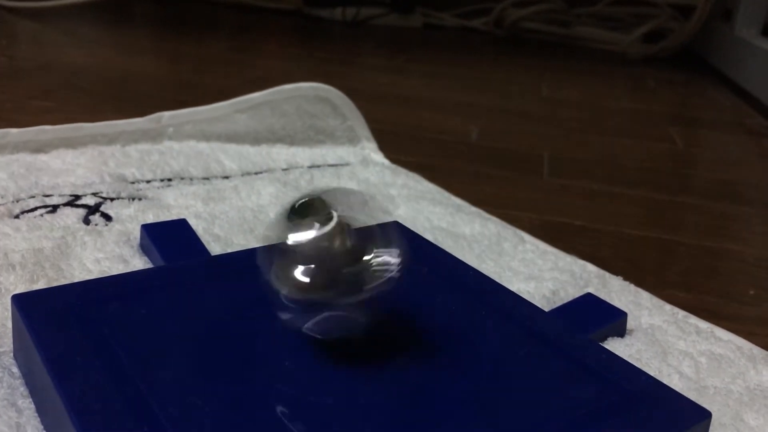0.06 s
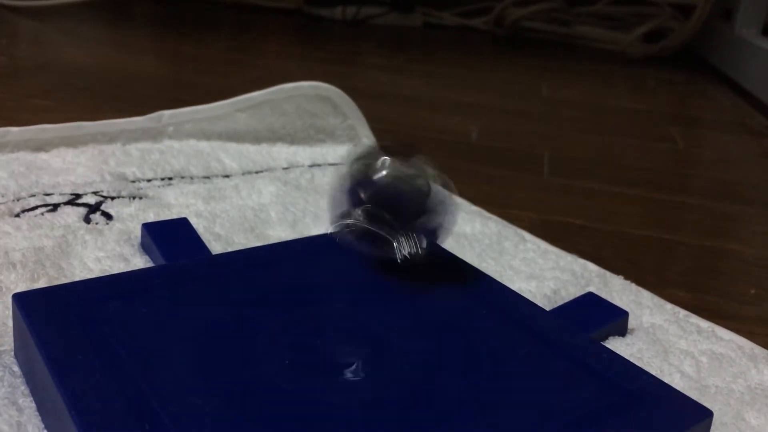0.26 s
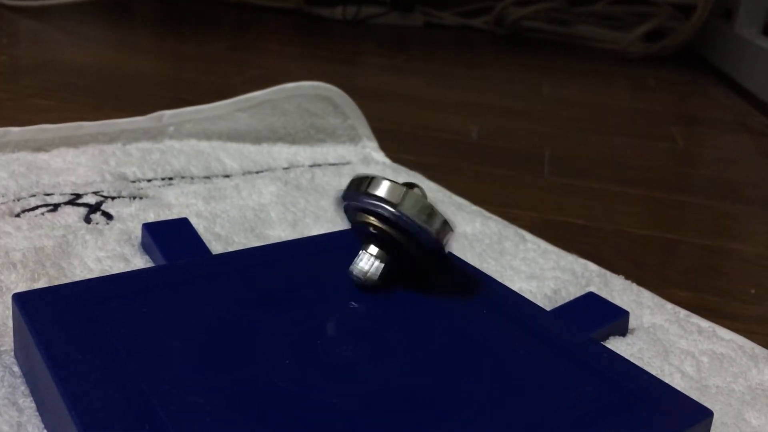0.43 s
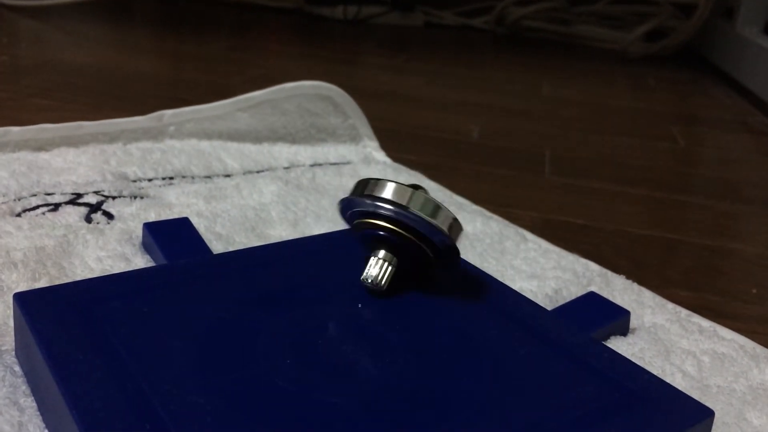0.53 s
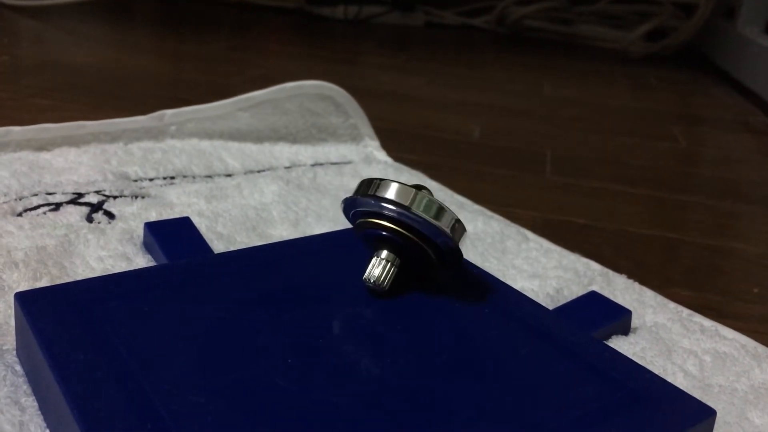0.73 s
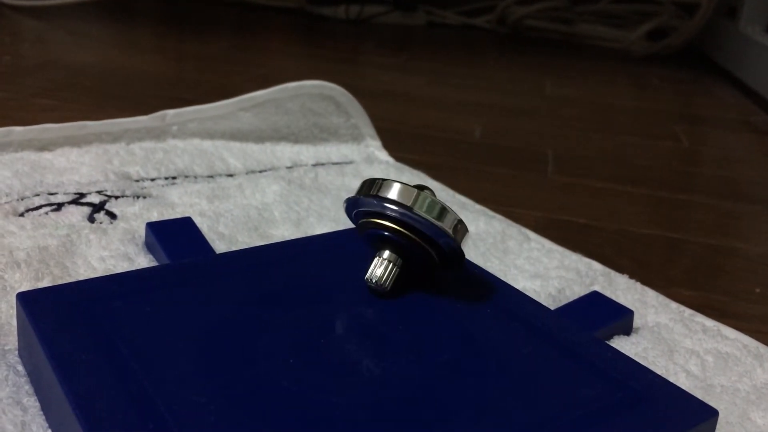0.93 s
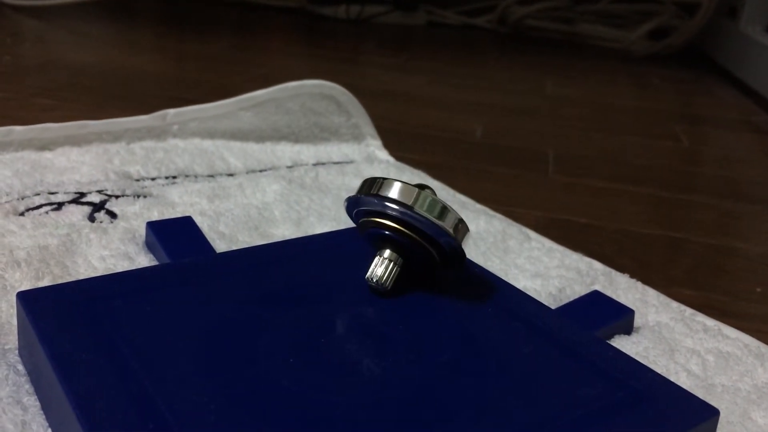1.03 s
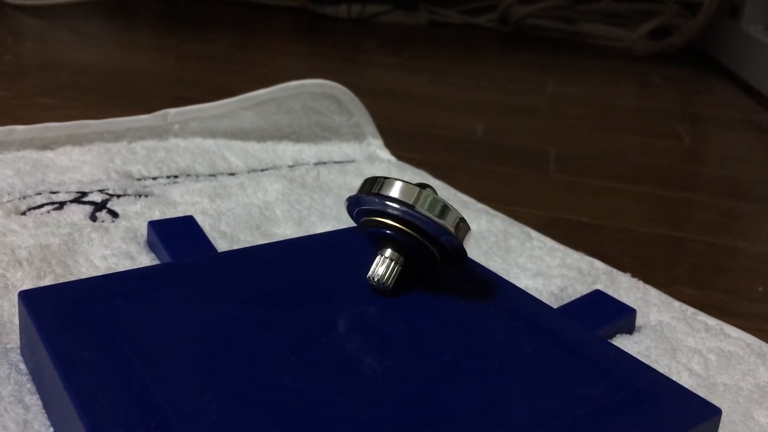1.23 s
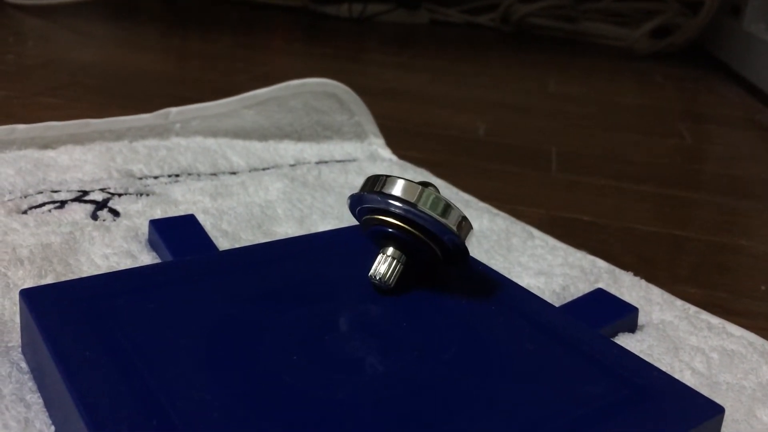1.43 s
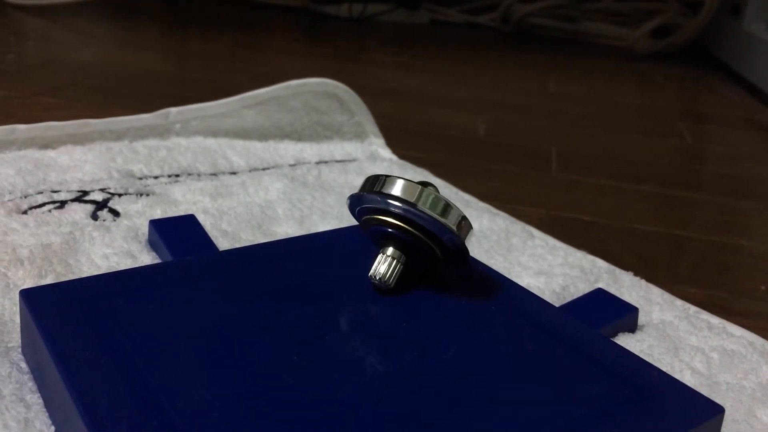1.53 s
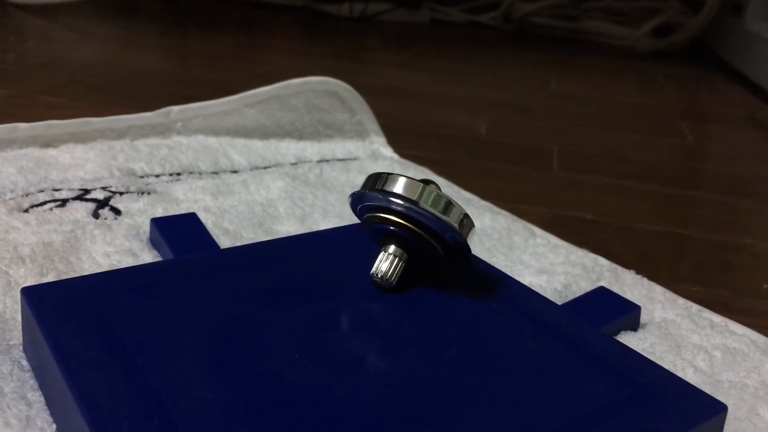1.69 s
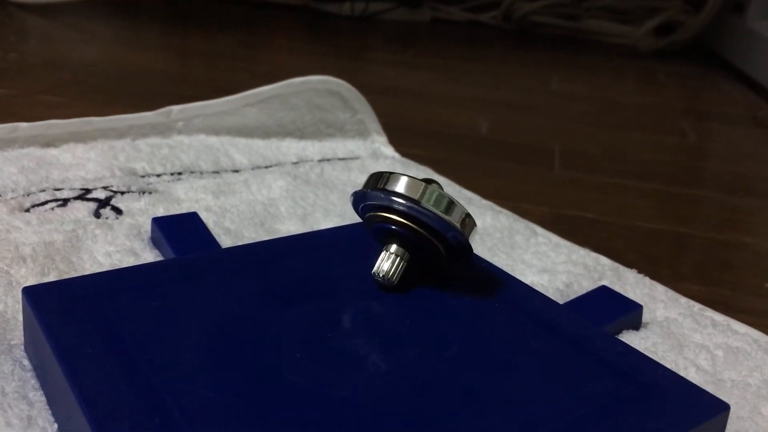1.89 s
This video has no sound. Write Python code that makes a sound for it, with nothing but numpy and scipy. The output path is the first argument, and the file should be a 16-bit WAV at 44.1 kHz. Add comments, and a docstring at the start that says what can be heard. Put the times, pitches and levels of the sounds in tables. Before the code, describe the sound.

In a quiet room, a metal top runs out of spin on a plastic block: light ticking, then a louder, scraping clatter with a soft low throb. It settles quickly, leaving only faint hum and room air.

```python
"""A small metal top runs out of spin on a hollow plastic block in a quiet room.
Its tip chatters, then its rim strikes the block in a quick run of clacks, skids and comes to rest.
Each contact rings the block's box and face and the top's body and loose parts.
The block rocks on its cloth with a low throb; room air and a faint appliance hum remain."""
import sys
import numpy as np
from scipy import signal
from scipy.fft import rfft, irfft
from scipy.io import wavfile

SR = 44100
rng = np.random.default_rng(int(sys.argv[2]) if len(sys.argv) > 2 else 0)


def transcribe(signal):
    """Save signal, clipped to [-1, 1], as a 16-bit WAV file at the path in sys.argv[1]."""
    frames = np.atleast_2d(signal).T
    limited = np.clip(frames, -1, 1)
    pcm = np.round(limited * 32767).astype(np.int16)
    wavfile.write(sys.argv[1], SR, pcm)


N = 85995
TIME = np.arange(N) / SR

# modes of the plastic block and the metal top: f/Hz, level/dB, T60/s
BLOCK_BOX = [(426.3, -20, .08), (508, -19.5, 0.054), (637.4, -7, 0.048), (707.4, -11, 0.072),
             (711.3, -7.5, .08), (762.5, -5.5, 0.033), (950, -11.5, 0.024)]
BLOCK_FACE = [(1149, -9, .04), (1299, -4.5, .04), (1483, -8.5, 0.029), (1645, -8.5, .018),
              (1866, -10.5, .016), (2180, -10, 0.012)]
TOP_BODY = [(2783, -15, .01), (3377, -6.5, 0.014), (3622, -2.5, .02), (4014, -2.5, 0.009),
            (4457, -8.5, .01), (4900, -6.5, .006), (5454, -9, 0.0077), (6590, -9, .006), (6820, -11, 0.017),
            (8000, -2.5, .004)]
TOP_PARTS = [(8457, 4, .005), (8460, -5, 0.008), (9330, 1, 0.019), (10270, 0.5, .009), (10860, -3, 0.012),
             (12366, -11.5, 0.0023), (12400, -7, .003), (13340, -2.5, 0.009)]
MODE_SETS = (BLOCK_BOX, BLOCK_FACE, TOP_BODY, TOP_PARTS)
# dry crack per mode set: f_low/Hz, f_high/Hz, level/dB re the ring at 0 dB hardness
CRACK_BANDS = [(720, 1120, 1.5), (1150, 2200, -1), (3100, 7100, 1), (7800, 14000, 4.5)]


def from_db(db):
    """Decibels to gain."""
    return 10 ** (np.asarray(db) / 20)


def unit_rms(x):
    """Scale to rms 1."""
    return x / np.sqrt(np.mean(x ** 2) + 1e-20)


def envelope(points):
    """Gain over time from points of t/s, level/dB."""
    return from_db(np.interp(TIME, *np.transpose(points)))


def at_hz(points, hz):
    """Interpolate on a log-frequency axis."""
    f, value = np.transpose(points)
    return np.interp(np.log(hz + 1), np.log(f), value)


def butter(x, hz, kind="band"):
    """Order-2 Butterworth; the tiny offset avoids denormals."""
    return signal.sosfilt(signal.butter(2, hz, kind, fs=SR, output="sos"), x + 1e-18)


def drift(cutoff_hz):
    """Slow random wander, rms 1."""
    return unit_rms(butter(rng.standard_normal(2 * N), cutoff_hz, "low")[N:])


def ring(force, modes, crack_band, hardness_db):
    """A force rings a set of modes and gives a dry crack; rms 1."""
    ringing = 0
    for k, (hz, db, t60_s) in enumerate(modes):
        r, w = from_db(-60 / (t60_s * SR)), 2 * np.pi * hz / SR
        mode = signal.lfilter([1, -r * np.cos(w)], [1, -2 * r * np.cos(w), r * r], force + 1e-18)
        ringing = ringing + (-1) ** k * from_db(db) * mode
    ringing = butter(ringing, .85 * modes[0][0], "high")
    low_hz, high_hz, crack_db = crack_band
    crack = from_db(crack_db + hardness_db) * unit_rms(butter(force, [low_hz, high_hz]))
    crack_polarity = rng.choice([-1, 1])   # random sign varies the colour from hit to hit
    return unit_rms(unit_rms(ringing) + crack_polarity * crack)


def scrape():
    """Dense tiny rim slips ring the modes; as the spin dies, the sound moves from metal to block."""
    # overall scrape contour: t/s, level/dB
    contour = [(0, -52.5), (.085, -63.5), (.105, -64), (0.133, -77), (.165, -62), (.195, -74), (0.221, -62),
               (.232, -37.5), (.255, -45), (0.382, -44), (.402, -34), (.435, -37), (0.491, -41), (.52, -60),
               (0.552, -68), (.585, -99), (0.621, -120)]
    slips_per_s, grain_db = 2200, 2.5
    slowing_s, stop_s, dulling_db_per_s = .43, contour[-1][0], 63.5
    sizes = from_db(grain_db * np.minimum(rng.exponential(1, N), 4)) * rng.choice([-1, 1], N)
    slips = sizes * (rng.random(N) < slips_per_s / SR)
    tilt_db = dulling_db_per_s * np.clip(TIME - slowing_s, 0, stop_s - slowing_s)
    levels_db = (-1 + tilt_db, -5 + tilt_db / 2, -3.5, -5 - tilt_db / 2)
    out = np.zeros(N)
    for modes, crack_band, db in zip(MODE_SETS, CRACK_BANDS, levels_db):
        out += from_db(db) * ring(slips, modes, crack_band, hardness_db=-2.5)
    return envelope(contour) * out


def rocking():
    """The shaken block rocks on its cloth: a low, unsteady throb."""
    # throb contour: t/s, level/dB
    contour = [(0, -46.5), (.025, -39), (.06, -50), (.14, -53), (.215, -65), (.245, -38), (.275, -35.5),
               (.31, -40.5), (.365, -37.5), (.42, -45.5), (.5, -58.5), (.62, -72)]
    rock_hz, waver, flutter_db = 84, .11, 2
    phase = 2 * np.pi * np.cumsum(rock_hz * (1 + waver * drift(39.86))) / SR
    return envelope(contour) * from_db(flutter_db * drift(43)) * unit_rms(np.sin(phase))


def background():
    """Steady room air and an appliance's hum."""
    # air noise spectrum: f/Hz, relative density/dB
    air_spectrum = [(25, -17.5), (53, -8.5), (80, -2.5), (120, -8), (150, -11.5), (212, -10.5),
                    (394, -19.5), (480, -18.5), (659, -17.5), (760, -26), (1300, -25.5), (1900, -25),
                    (2500, -32.5), (3720, -37), (8000, -42.5), (14800, -44.5)]
    # hum tones: f/Hz, level/dB
    hum_tones = [(91.5, -71.5), (118.6, -65), (506, -80.5), (672, -82.5)]
    air_db, jitter_rad = -62.5, .14
    bins_hz = np.arange(N // 2 + 1) * SR / N
    air = irfft(rfft(rng.standard_normal(N)) * from_db(at_hz(air_spectrum, bins_hz)), N)
    hum = sum(from_db(db) * unit_rms(np.sin(2 * np.pi * hz * TIME + jitter_rad * drift(4)))
              for hz, db in hum_tones)
    return from_db(air_db) * unit_rms(air) + hum


def contact_force(graze_s, length_s=.2):
    """One touch, then a brief swell of micro-impacts as the spinning rim grazes on."""
    impacts_per_s, graze_db = 16000, -9
    t = np.arange(int(length_s * SR)) / SR
    swell = np.abs(np.sin(np.pi * np.minimum(t / graze_s, 1))) ** 1.2
    impacts = rng.standard_normal(len(t)) * (rng.random(len(t)) < impacts_per_s / SR)
    force = from_db(graze_db) * swell * impacts
    force[0] = 1
    return force


def add_hit(out, start_s, sound, db, attack_s=.005):
    """Mix a sound in, scaled so that its attack has the given level."""
    i = int(start_s * SR)
    out[i:i + len(sound)] += from_db(db) * sound[:N - i] / np.std(sound[:int(attack_s * SR)])


def clatter():
    """Each contact rings block and top over a dull thud; harder contacts crack more."""
    # contacts, before trim: t/s, graze/s, box knock/dB, face slap/dB, body clack/dB, parts tick/dB
    contacts = [(0.0055, 0.0007, -37, -44, -44, -36), (0.0166, 0.001, -38, -46, -60, -58),
                (0.0268, 0.001, -40, -48, -48, -51), (0.0376, 0.001, -43, -53, -54, -51),
                (0.045, 0.001, -50, -56, -60, -53), (0.055, 0.001, -41, -57, -53, -47),
                (0.064, 0.001, -42, -52, -50, -48), (0.07, 0.001, -43, -52, -50, -55),
                (0.0768, 0.001, -39, -50, -57, -61), (0.083, 0.002, -44, -50, -47, -55),
                (0.113, 0.001, -47, -53, -57, -61), (0.1435, 0.001, -44, -44, -47, -48),
                (0.1505, 0.001, -43, -49, -63, -63), (0.1715, 0.002, -49, -51, -53, -55),
                (0.176, 0.001, -47, -48, -51, -56), (0.2097, 0.001, -59, -59, -52, -52),
                (0.2176, 0.001, -53, -53, -52, -50), (0.225, 0.002, -30, -28, -22, -21),
                (0.2608, 0.004, -30, -37, -25, -23), (0.2683, 0.0018, -31, -38, -29, -33),
                (0.2733, 0.002, -40, -45, -30, -33), (0.2818, 0.002, -30, -31, -23, -24),
                (0.2888, 0.001, -38, -41, -34, -27), (0.3086, 0.0032, -31, -36, -20, -20),
                (0.3223, 0.002, -27, -31, -22, -27), (0.3445, 0.0018, -28, -31, -24, -33),
                (0.3613, 0.0028, -24, -25, -19, -17), (0.3745, 0.0015, -41, -41, -42, -39),
                (0.3904, 0.002, -22, -24, -19, -20), (0.3945, 0.003, -29, -31, -30, -31),
                (0.4018, 0.001, -31, -26, -29, -35), (0.407, 0.004, -34, -34, -35, -35),
                (0.4155, 0.001, -31, -37, -23, -30), (0.4203, 0.0023, -34, -38, -26, -23),
                (0.4555, 0.0025, -35, -35, -33, -36), (0.46, 0.001, -43, -45, -37, -39),
                (0.474, 0.001, -47, -50, -41, -50), (0.49, 0.0025, -36, -43, -36, -42),
                (0.512, 0.004, -38, -43, -52, -60), (0.523, 0.003, -50, -66, -54, -62),
                (0.559, 0.004, -61, -71, -59, -55)]
    trims_db = (-1, -.5, 1, .2)
    hard_hit_db, crack_db_per_db = -19.5, .51
    thud_hz, thud_offset_db = 175, -22
    out = np.zeros(N)
    for start_s, graze_s, *levels_db in contacts:
        force = contact_force(graze_s)
        for modes, crack_band, db in zip(MODE_SETS, CRACK_BANDS, np.add(levels_db, trims_db)):
            hardness_db = crack_db_per_db * (db - hard_hit_db)
            add_hit(out, start_s, ring(force, modes, crack_band, hardness_db), db)
        thud = butter(np.abs(force), [thud_hz / 2, thud_hz * 2])
        add_hit(out, start_s, thud, levels_db[0] + thud_offset_db)
    return out


def room(x):
    """Scatter from the floor and near furniture, then a short tail that dies band by band."""
    # tail decay: f/Hz, T60/s
    decay_times = [(100, 0.2798), (700, 0.23), (2000, .25), (4000, 0.19), (9000, .2), (15000, .18)]
    tail_db, tail_delay_s = -22.5, .0049
    near_db, near_t60_s = -14.5, .081
    t = TIME[:SR // 2]
    edges_hz = np.geomspace(100, 18000, 13)
    tail = np.zeros(len(t))
    for low_hz, high_hz in zip(edges_hz, edges_hz[1:]):
        t60_s = at_hz(decay_times, np.sqrt(low_hz * high_hz))
        tail += butter(rng.standard_normal(len(t)), [low_hz, high_hz]) * from_db(-60 * t / t60_s)
    tail *= t > tail_delay_s
    near = rng.standard_normal(len(t)) ** 3 * from_db(-60 * t / near_t60_s) * (t > tail_delay_s / 2)
    tail *= from_db(tail_db) / np.linalg.norm(tail)
    near *= from_db(near_db) / np.linalg.norm(near)
    return signal.fftconvolve(x, near + tail)[:N]


def scene():
    """The top on its block, in the room; mono."""
    top = clatter() + scrape()
    return (top + room(top) + rocking() + background())[None]


def record(dry):
    """Soft peak limit, then a steep low-pass."""
    peak_limit, cutoff_hz = .95, 15650
    rounded = peak_limit * np.tanh(dry / peak_limit)
    return signal.sosfilt(signal.ellip(10, .2, 70, cutoff_hz, fs=SR, output="sos"), rounded)


dry = scene()
out = record(dry)
transcribe(out)
```